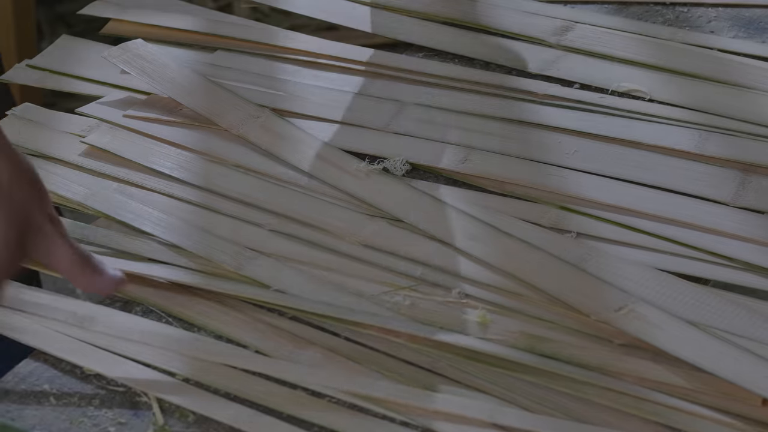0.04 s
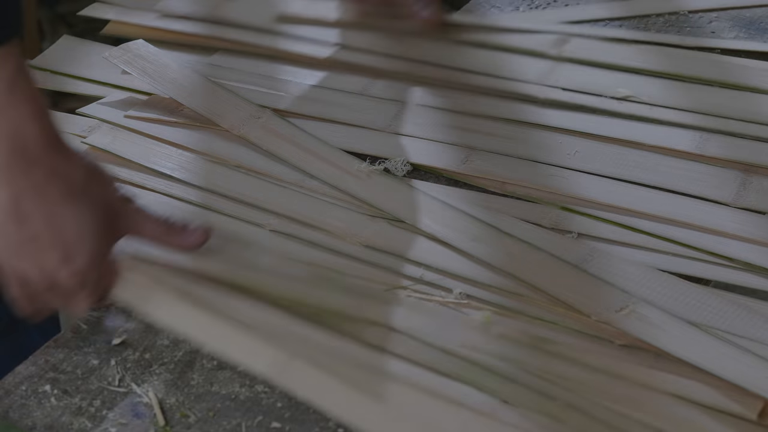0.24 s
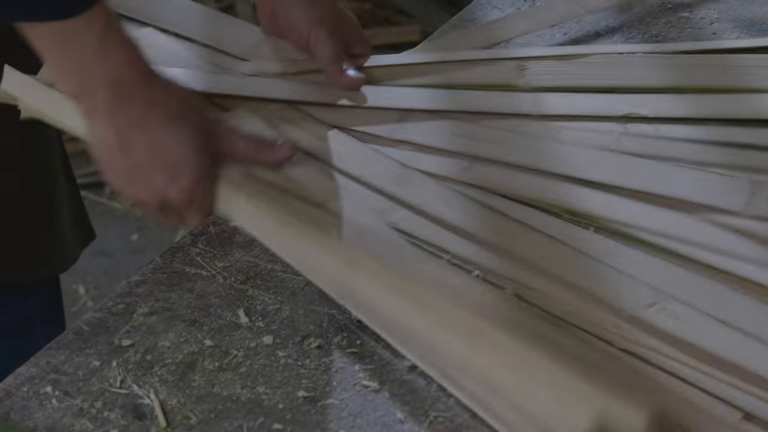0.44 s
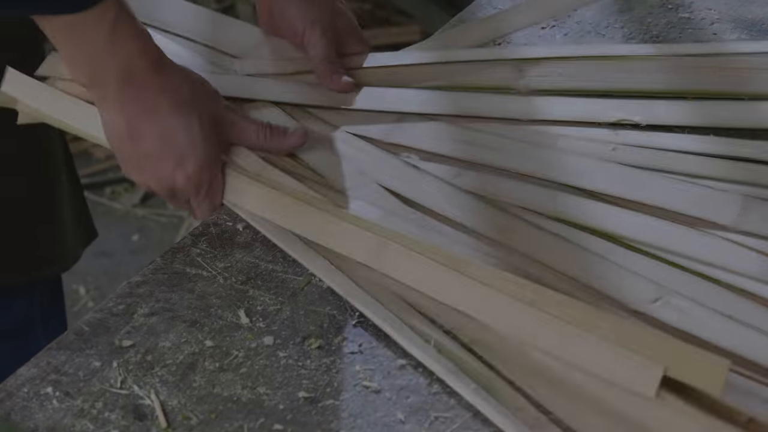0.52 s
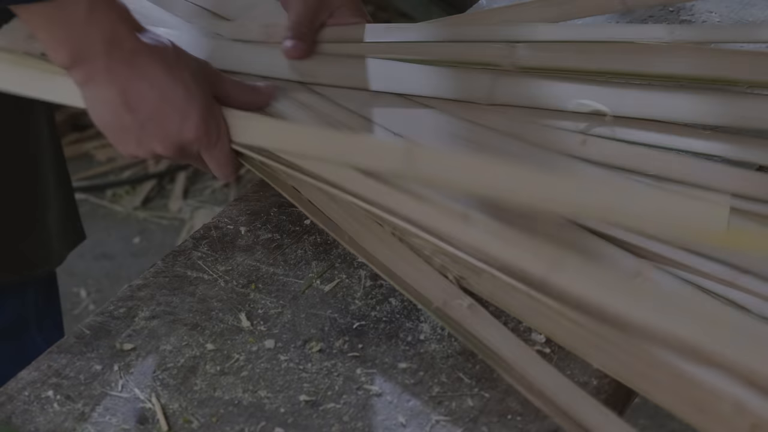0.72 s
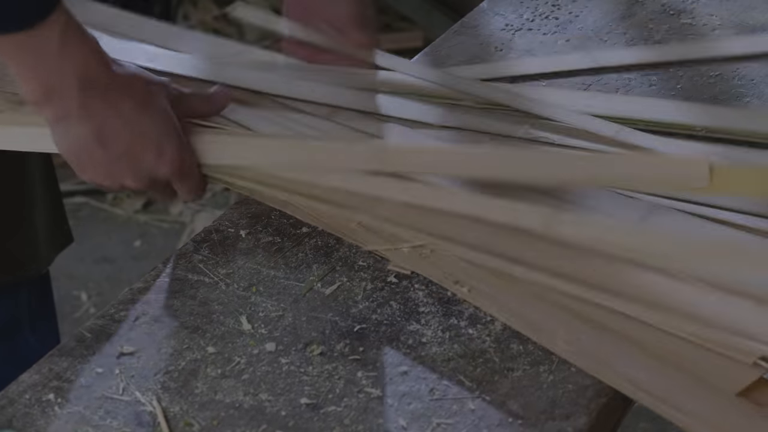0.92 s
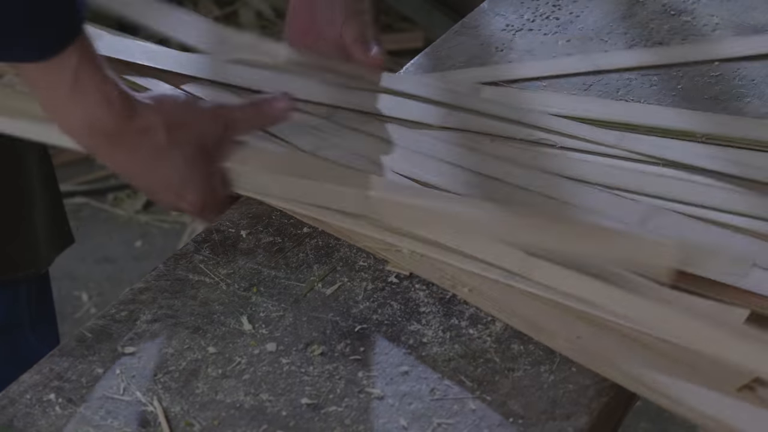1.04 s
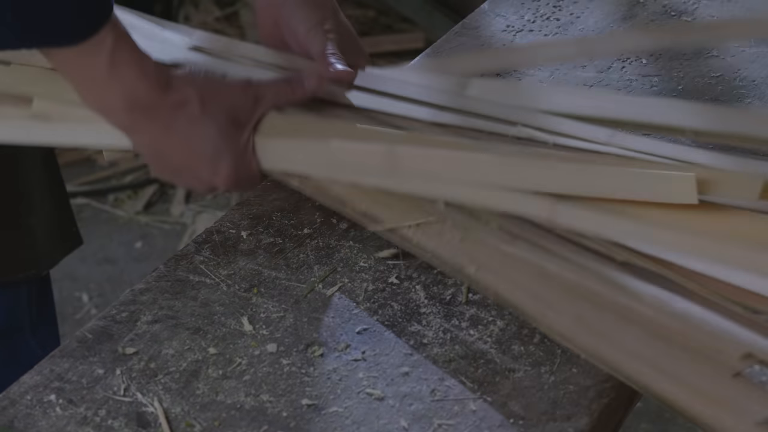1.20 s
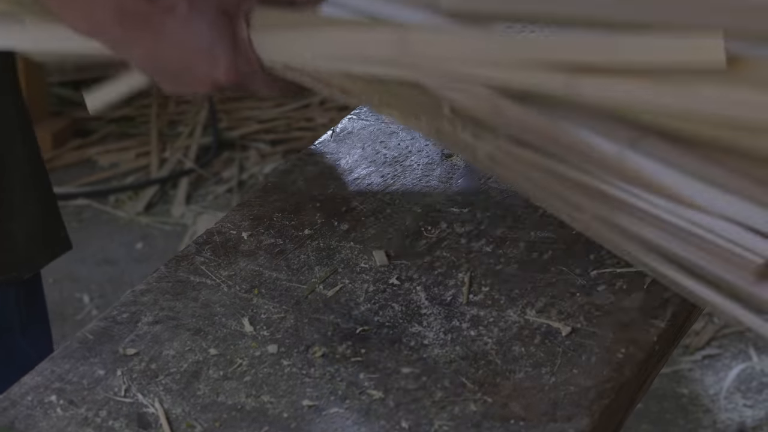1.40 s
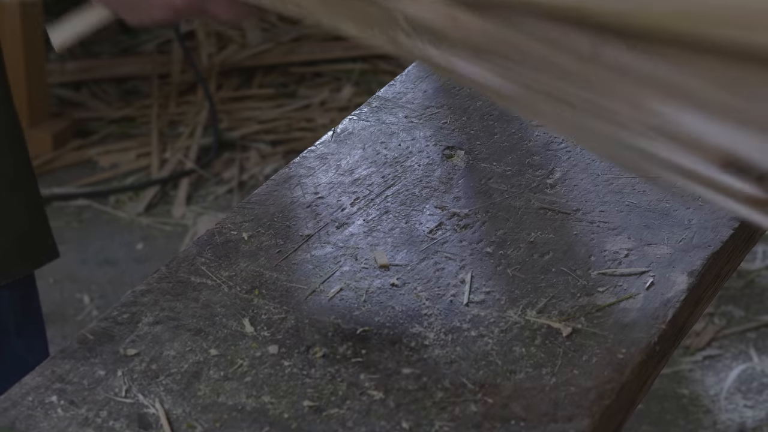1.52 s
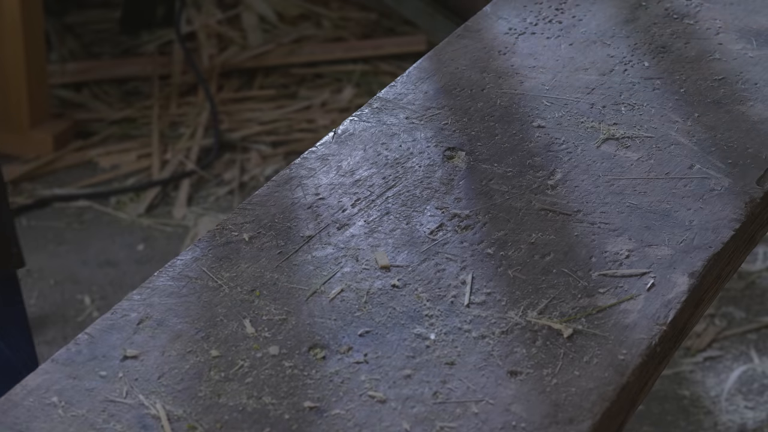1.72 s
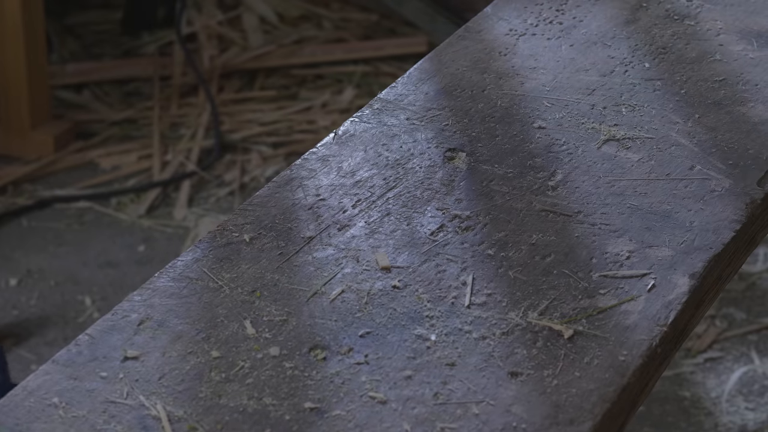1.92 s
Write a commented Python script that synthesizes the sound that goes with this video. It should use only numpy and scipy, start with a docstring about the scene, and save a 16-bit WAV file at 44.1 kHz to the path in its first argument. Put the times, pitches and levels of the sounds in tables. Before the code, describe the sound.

A dry clatter of bamboo strips starts quickly, with woody knocks and splintery scraping as they slide across a gritty bench. After a last sharp clack it fades, with a brief echo from the small room.

```python
"""Dry bamboo strips rattle as two hands sweep them into a bundle and drag it off a dusty workbench.
Stick-slip friction between the strips excites their bending modes, and splintery edges crackle over
the grit. Loose strips clack together and slap the bench, its top rumbles, and smooth skins squeak.
A small workshop reverberates briefly over faint air noise; the sound is mono."""
import sys
import numpy as np
from scipy import signal
from scipy.fft import rfft, irfft
from scipy.io import wavfile
from scipy.ndimage import uniform_filter1d

SR = 44100
rng = np.random.default_rng(int(sys.argv[2]) if len(sys.argv) > 2 else 0)


def unload_wav(signal):
    """Save mono or channel-first audio to the path in sys.argv[1] as 16-bit WAV at rate SR, clipped to [-1, 1]."""
    wavfile.write(
        sys.argv[1],
        SR,
        np.round(np.clip(np.atleast_2d(signal).T, -1, 1) * 32767).astype(np.int16),
    )


N = 85995
TOP_HZ = 16000


def rattle(count=14):
    """Stick-slip excitation: each strip stutters along its neighbours and rings in its own modes."""
    # Each row: frequency in Hz, relative level in dB.
    spectrum = [(450, -18), (800, -10), (1100, -1), (1800, -4.5), (2800, -2.5), (3700, 1), (4150, -4),
                (4800, -16), (6500, -8), (9000, -33)]
    strips = sum(through(contacts(rate=110, spread_db=1.5), strip(t60=0.027)) for _ in range(count))
    bundle = pile(strips * catches(rate=50, depth_db=1.8), ring_db=-17.5)
    return undb(-1) * dragged(through(bundle, colour(spectrum)), column=1, window=1800)


def strip(t60, count=36):
    """Bending modes of one strip: damping grows with frequency, and t60 holds at 2 kHz."""
    hz = 220 + 4800 * (np.arange(count) + rng.random(count)) / count
    return ringing(hz, rng.choice([-1, 1], count), t60 * (hz / 2000) ** -.5, size=2000)


def pile(x, ring_db):
    """Sympathetic resonance: x excites the modes of the strips lying on the bench."""
    # Each row: frequency in Hz, relative level in dB, 60 dB decay time in seconds.
    modes = [(268, 0, 0.36), (499.5, -7, 0.25), (590.5, 0.5, 0.09), (735.8, 7, 0.48), (946, 0.5, 0.04),
             (1160, -8, 0.36), (1713, 12, 0.031), (1798, 13, 0.037), (2383, -24.5, 0.12), (2718, 0.5, 0.16),
             (2640, -4.5, 0.24), (3456, -1.5, 0.023), (3677, 5, 0.035), (3727, 3.5, 0.017)]
    hz, db, t60 = np.array(modes, float).T
    gains = undb(db) * (-1) ** np.arange(len(hz))
    return x + undb(ring_db) * through(x, ringing(hz, gains, t60))


def contacts(rate, spread_db):
    """A Poisson process of tiny impacts, rate per second, mostly weak with a few strong ones."""
    strength = undb(spread_db * np.minimum(rng.exponential(size=N), 4))
    return (rng.random(N) < rate / SR) * strength * rng.choice([-1, 1], N)


def catches(rate, depth_db):
    """Amplitude modulation by friction: quick random swells as the strips catch and let go."""
    hold = max(int(SR / rate), 2)
    steps = rng.standard_normal(N)[np.arange(N) // hold]
    return undb(depth_db * uniform_filter1d(steps, hold))


def dragged(x, column, window=2600):
    """Envelope shaping: x is divided by its running RMS, then follows one level curve of the drag."""
    # Each row: time in seconds, then relative levels in dB of rattle, scrape, fizz and bench rumble.
    drag = [(0, -53.5, -64, -72, -39), (0.06, -55.5, -68.5, -76, -74), (0.155, -53, -63.5, -66, -88),
            (0.173, -40, -46.5, -52, -41.5), (0.249, -34, -39.5, -44, -43.5),
            (0.289, -25, -37.5, -40, -30.5), (0.335, -24, -32, -41, -36), (0.42, -24.5, -37, -43, -31.5),
            (0.508, -23, -34.5, -39, -34), (0.585, -35.5, -48, -49, -41), (0.64, -30, -41, -47, -39.5),
            (0.685, -35, -50, -53, -38), (0.714, -29.5, -40.5, -45, -42), (0.79, -32, -43.5, -48, -39.5),
            (0.87, -29.5, -41, -47, -38.5), (0.93, -26, -35.5, -43, -33.5), (1.0, -32.5, -40.5, -49, -43),
            (1.049, -29.5, -39.5, -44.5, -38.5), (1.085, -38, -46, -55, -45.5),
            (1.118, -28.5, -42.5, -47, -36), (1.192, -24, -34.5, -48, -33), (1.257, -40, -54, -55, -41),
            (1.276, -24, -35.5, -45.5, -34), (1.33, -29.5, -43.5, -50.5, -38),
            (1.4, -37.5, -46, -52, -44.5), (1.448, -31, -48, -58, -38.5), (1.52, -41, -52.5, -70, -48),
            (1.57, -43.5, -62, -66, -47), (1.62, -36.5, -55.5, -72, -48.5),
            (1.72, -32.5, -57.5, -63, -55.5), (1.81, -62, -67, -75, -64), (1.93, -57, -70, -70, -60)]
    rows = np.array(drag)
    steady = x / np.sqrt(uniform_filter1d(x ** 2, window) + 1e-12)
    return steady * undb(np.interp(np.arange(N) / SR, rows[:, 0], rows[:, column]))


def clacks():
    """Impact transients superpose as loose strips strike each other and the bench."""
    # Each row: start in seconds, relative levels in dB of slap, knock, ring and tick,
    # slap pitch in Hz, knock pitch in Hz, time constant of the chatter in seconds.
    impacts = [(0.107, -76, -52, -47.5, -73, 550, 2350, 0.0062),
               (0.165, -56, -44, -40.5, -41, 583, 1970, 0.011),
               (0.188, -46, -36, -35, -38.5, 730, 2000, 0.016),
               (0.217, -43, -42, -28, -44, 630, 2010, 0.0092),
               (0.242, -54, -37, -29.5, -46, 640, 1940, 0.006),
               (0.296, -21.5, -19, -20, -49, 715, 1860, 0.0038),
               (0.332, -34, -27, -39, -27, 640, 1900, 0.017),
               (0.381, -39, -39, -26, -32, 595, 1860, 0.0092),
               (0.4616, -33, -23.5, -17.5, -27, 650, 1920, 0.0089),
               (0.471, -59.5, -33, -21, -34, 700, 2010, 0.0059),
               (0.4925, -24.5, -24.5, -47, -39, 610, 2500, 0.0033),
               (0.504, -32, -24, -23, -29.5, 576, 2350, 0.0049),
               (0.544, -60, -27.5, -23.5, -41, 700, 1790, 0.0084),
               (0.6, -42, -41, -25.5, -32.5, 640, 1920, 0.0095),
               (0.644, -42, -31, -23, -34.5, 650, 1940, 0.011),
               (0.827, -48, -43, -31, -38, 745, 2030, 0.0051),
               (0.875, -33, -27.5, -35, -50, 660, 1930, 0.003),
               (0.9011, -40, -22, -33, -44, 392, 1710, 0.0016),
               (0.9065, -34, -23, -17.5, -29.5, 347, 2120, 0.0048),
               (0.9186, -40.5, -38, -24, -28, 352, 1930, 0.0082),
               (0.925, -35, -25.5, -19, -44, 363, 2570, 0.0012),
               (0.96, -44, -26, -33, -26.5, 560, 2360, 0.003),
               (1.027, -67, -48, -30, -39, 550, 1880, 0.0028),
               (1.1039, -40, -30, -21, -36, 524, 1970, 0.0054),
               (1.1675, -45, -26.5, -16.5, -33, 590, 2190, 0.0043),
               (1.191, -49, -34, -39, -34, 780, 1660, 0.0081),
               (1.266, -32, -25, -29, -62, 435, 1460, 0.008),
               (1.28, -34.5, -25.5, -25, -54, 355, 1600, 0.0095),
               (1.325, -47, -27.5, -27, -42, 536, 1830, 0.006),
               (1.366, -39, -32, -29, -35.5, 770, 1570, 0.0053),
               (1.4133, -34, -20.5, -28.5, -41, 733, 2340, 0.0027),
               (1.429, -40, -38, -24, -57, 374, 1690, 0.0041),
               (1.449, -48, -28.5, -43, -41, 685, 1500, 0.0043),
               (1.491, -66, -30.5, -55, -39.5, 730, 1614, 0.0034),
               (1.499, -39, -29.5, -28.5, -43, 660, 1390, 0.0059),
               (1.587, -47, -31.5, -38, -46.5, 623, 1810, 0.023),
               (1.645, -34, -25.5, -16, -37.5, 807, 2140, 0.004),
               (1.853, -70, -43, -44, -63, 500, 1470, 0.0083), (1.94, -59, -46, -43, -49, 533, 1480, 0.011)]
    out = np.zeros(N)
    for start, *levels_db, slap_hz, knock_hz, chatter_s in impacts:
        i = int(start * SR)
        x = clack(levels_db, slap_hz, knock_hz, chatter_s)[:N - i]
        out[i:i + len(x)] += x
    return out


def clack(levels_db, slap_hz, knock_hz, chatter_s, size=4096):
    """Decaying contact chatter excites a hollow slap, woody knock, bright ring and splintery tick."""
    # Each row: frequency as a multiple of the pitch, relative level in dB.
    slap_shape = [(.2, -25), (.45, -17), (.8, -8), (1, 2), (1.25, -1), (1.8, -12), (3, -37)]
    knock_shape = [(.3, -32.5), (.5, -5), (.8, -2), (1, 2.5), (1.25, -7), (1.8, -11), (3.2, -35.5)]
    # Each row: frequency in Hz, relative level in dB.
    ring_spectrum = [(1700, -33), (2700, -5.5), (3150, -4.5), (3750, 1), (4200, -11.5), (5000, -17),
                     (8000, -22.5)]
    tick_spectrum = [(2500, -18), (4800, 0), (6500, 3.5), (9000, -1), (13000, 0), (16000, -3.5)]
    t = np.arange(size) / SR
    impulses = rng.choice([-1, 1], (4, size)) * (rng.random(size) < .5)
    chatter = impulses * np.exp(-t / max(chatter_s, .001))
    parts = (resonance(chatter[0], slap_shape, slap_hz, ring_db=-6.5, t60=0.079),
             resonance(chatter[1], knock_shape, knock_hz, ring_db=-15, t60=0.029),
             through(chatter[2], colour(ring_spectrum)),
             through(chatter[3], colour(tick_spectrum)))
    gains = undb(np.add(levels_db, [0.5, 0, -1.5, 0]))
    blow_s = 0.0058  # each part carries the energy of its level held this long
    return np.sqrt(blow_s * SR) * sum(gain * unit(part) for gain, part in zip(gains, parts))


def resonance(x, shape, hz, ring_db, t60, size=4096):
    """A broad resonance of a struck strip, with one damped mode ringing on at its centre."""
    mode = np.cos(2 * np.pi * hz * np.arange(size) / SR) * decay(t60, size)
    broad = unit(through(x, colour([(ratio * hz, db) for ratio, db in shape])))
    return broad + undb(ring_db) * unit(through(broad, mode))


def crackle():
    """Roughness noise: splintery edges scrape on each other and fizz over dust, catching together."""
    # Each row: frequency in Hz, relative level in dB.
    scrape_spectrum = [(3000, -27), (4700, 0.5), (6700, -2), (8800, -7), (11000, -11)]
    fizz_spectrum = [(7500, -14), (10000, -2.5), (13500, 4), (16000, -3.5)]
    grip = catches(rate=290, depth_db=1.0)
    scrape = through(contacts(rate=4000, spread_db=2.5) * grip, colour(scrape_spectrum))
    fizz = through(contacts(rate=3600, spread_db=5.0) * grip, colour(fizz_spectrum))
    return undb(0.5) * dragged(scrape, column=2) + undb(-1.5) * dragged(fizz, column=3)


def bench():
    """Forced vibration: the bench top rumbles as the sliding strips drum on it."""
    # Each row: frequency in Hz, relative level in dB.
    spectrum = [(60, -24), (100, -20), (160, -3.5), (200, -3.5), (270, -0.5), (380, -2.5), (550, 2),
                (750, 1), (1000, -8), (1800, -34)]
    drumming = pile(contacts(rate=800, spread_db=2), ring_db=-21.5)
    return undb(-3.5) * dragged(through(drumming, colour(spectrum)), column=4)


def squeaks(half_width_s=0.0032, pitch_spread=.06):
    """Stick-slip oscillation of one smooth skin on another gives tiny tones of unsteady pitch."""
    # Each row: centre time in seconds, frequency in Hz, level in dB.
    tones = [(0.704, 8800, -34.5), (.715, 7800, -38), (.773, 7600, -42), (0.779, 6800, -38.5),
             (.828, 7100, -43), (.868, 13400, -36)]
    t = np.arange(N) / SR
    wobble = 1 + pitch_spread * np.sqrt(30) * uniform_filter1d(rng.standard_normal(N), size=30)
    phase_per_hz = 2 * np.pi * np.cumsum(wobble) / SR
    return sum(np.sqrt(2) * undb(db) * np.sin(hz * phase_per_hz) * np.exp(-((t - at) / half_width_s) ** 2)
               for at, hz, db in tones)


def workshop(x, build_s=0.02, dull_hz=6600, size=24000, bands=9):
    """Reverberation: diffuse reflections build up and fade, lasting longest in the midrange."""
    # Each row: frequency in Hz, reverberation time in seconds.
    room_t60 = [(150, 0.16), (700, 0.45), (1500, 0.5), (3700, 0.23), (7000, 0.25), (16000, 0.15)]
    t, hz = np.arange(size) / SR, np.arange(size // 2 + 1) * SR / size
    noise = rfft(rng.standard_normal(size)) / np.hypot(1, hz / dull_hz)
    centres = np.geomspace(100, TOP_HZ, bands)
    tail = np.zeros(size)
    for centre, weights in zip(centres, np.eye(bands)):
        band = irfft(noise * on_log(hz, list(zip(centres, weights))))
        tail += band * decay(on_log(centre, room_t60), size)
    onset = 1 - np.exp(-t / build_s)
    return .6 * undb(-9.5) * through(x, unit(tail * onset))


def air():
    """Ambient noise floor: the faint, steady air of the workshop."""
    # Each row: frequency in Hz, relative level in dB.
    spectrum = [(25, -11), (70, 8.5), (150, -7.5), (350, 7.5), (700, 1), (1500, -22), (3800, -11.5),
                (5500, -42.5), (16000, -43)]
    return undb(-59) * through(rng.standard_normal(N), colour(spectrum))


def ringing(hz, gain, t60, size=6000):
    """Modal superposition at unit energy; gain sets each damped mode's share."""
    t = np.arange(size) / SR
    modes = np.sin(2 * np.pi * hz[:, None] * t) * decay(t60[:, None], size)
    return unit((gain / np.sqrt(t60)) @ modes)


def colour(points, size=2048):
    """Minimum-phase, unit-energy response through (Hz, dB) points, rolling off beyond their ends."""
    hz = np.maximum(np.arange(size // 2 + 1), .5) * SR / size
    octaves_outside = np.maximum(np.log2(points[0][0] / hz), 0) + np.maximum(np.log2(hz / points[-1][0]), 0)
    skirt_db = np.minimum(32 * octaves_outside, 28)
    cepstrum = irfft(np.log(undb(on_log(hz, points) - skirt_db)))
    cepstrum[1:size // 2] *= 2  # folding onto positive time makes the response causal
    cepstrum[size // 2 + 1:] = 0
    return unit(irfft(np.exp(rfft(cepstrum))))


def decay(t60, size):
    """Exponential damping by 60 dB in t60 seconds."""
    t = np.arange(size) / SR
    return np.exp(-np.log(1000) * t / t60)


def on_log(hz, points):
    """Interpolation of (Hz, value) points on a log-frequency axis."""
    freqs, values = np.array(points, float).T
    return np.interp(np.log(hz + 1), np.log(freqs), values)


def through(x, response):
    """Convolution with an impulse response."""
    return signal.fftconvolve(x, response)[:len(x)]


def unit(x):
    """Normalisation to unit energy."""
    return x / np.sqrt(np.sum(x ** 2) + 1e-18)


def undb(db):
    """Decibels to amplitude ratio."""
    return 10 ** (np.asarray(db) / 20)


def scene():
    """Superposition of direct sound, reverberation and air, alike in both channels."""
    direct = rattle() + crackle() + bench() + clacks() + squeaks()
    mono = direct + workshop(direct) + air()
    return np.array([mono, mono])


def record(dry):
    """Band limiting: a steep elliptic low-pass removes the treble above TOP_HZ."""
    return signal.sosfilt(signal.ellip(10, .2, 70, TOP_HZ, fs=SR, output="sos"), dry)


dry = scene()
out = record(dry)
unload_wav(out)
```